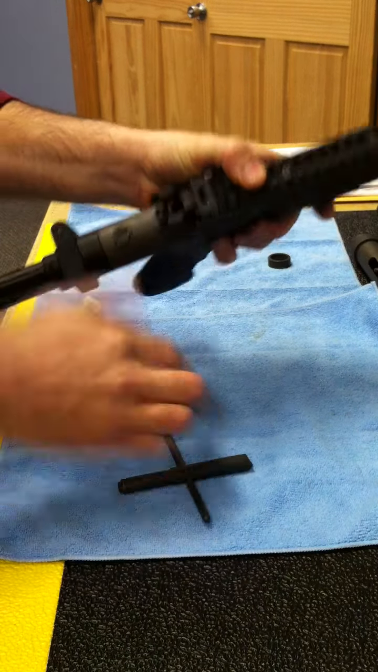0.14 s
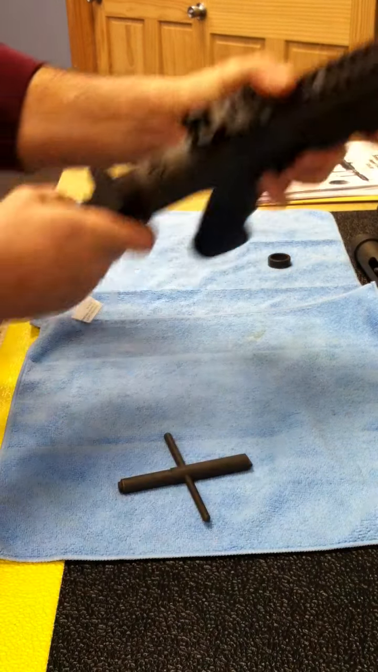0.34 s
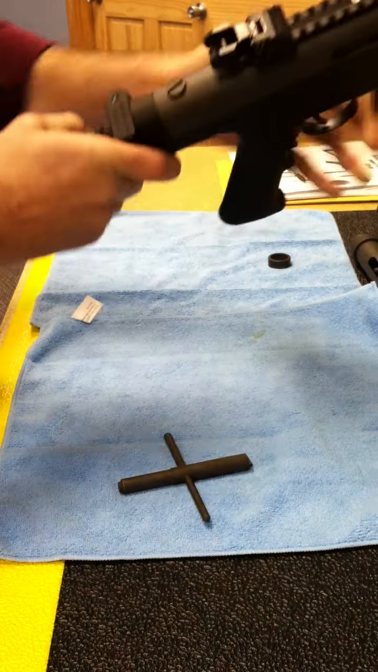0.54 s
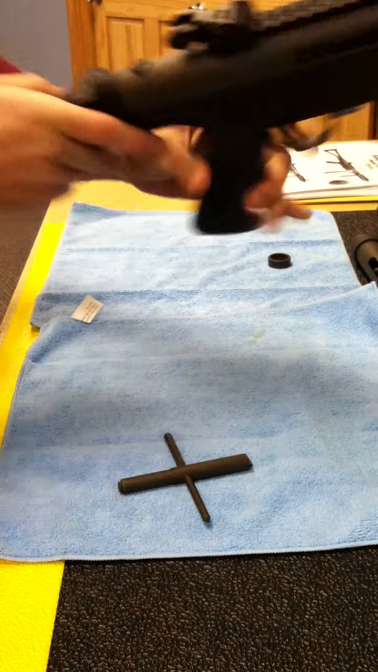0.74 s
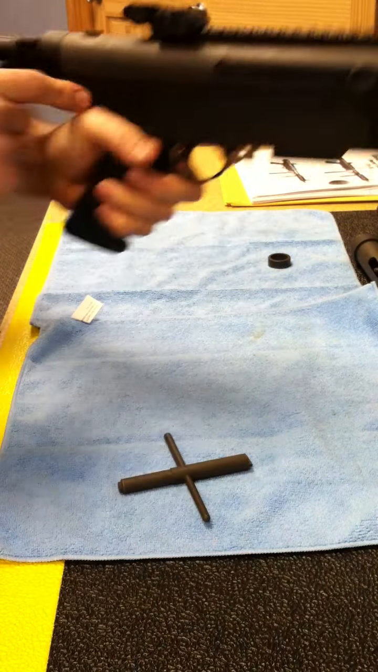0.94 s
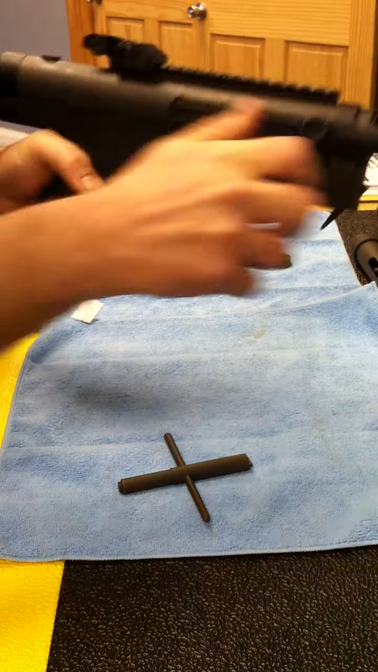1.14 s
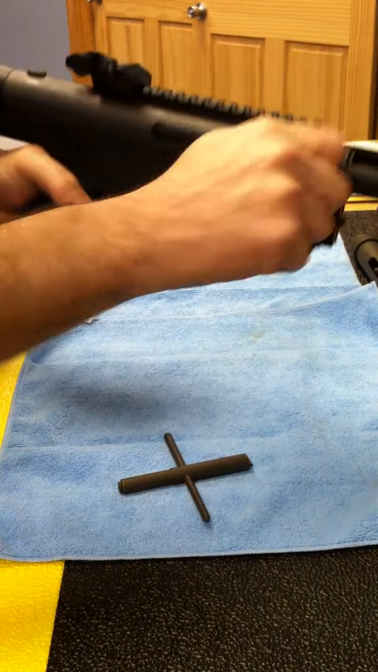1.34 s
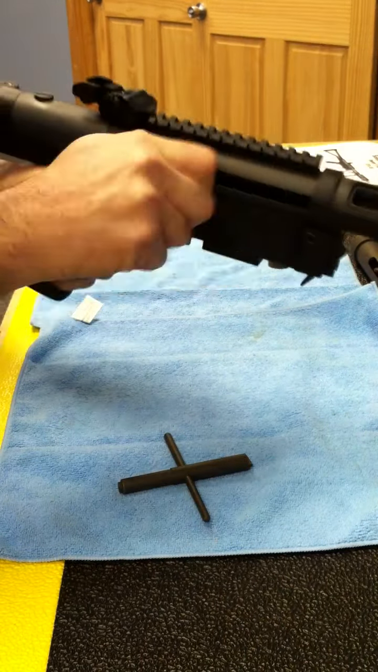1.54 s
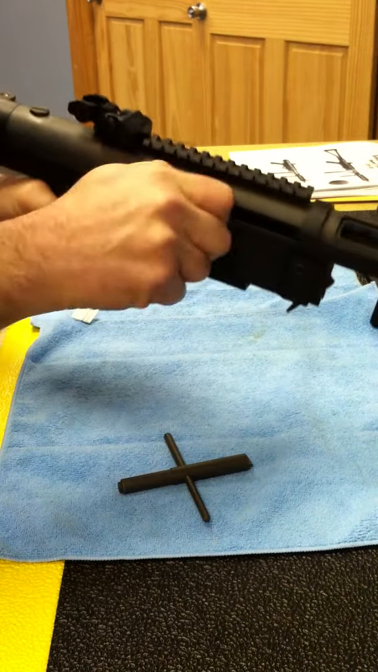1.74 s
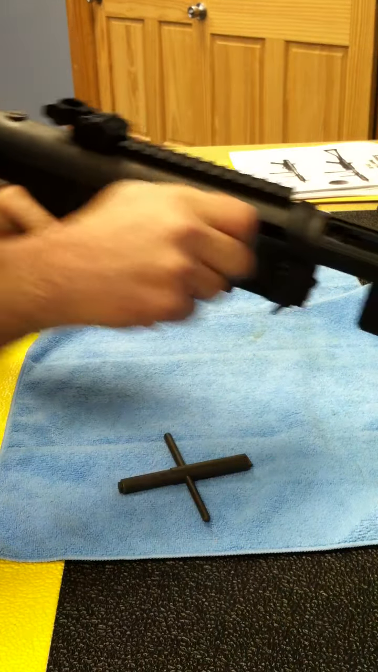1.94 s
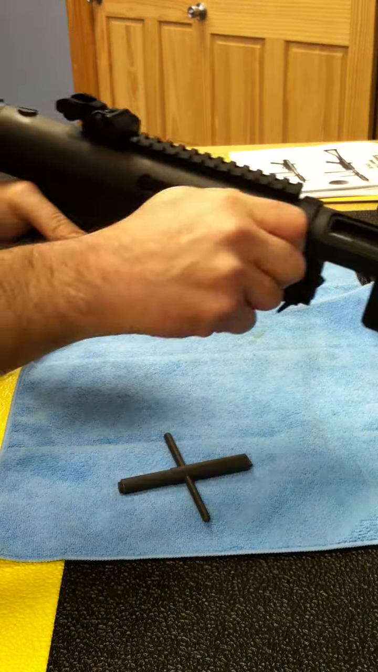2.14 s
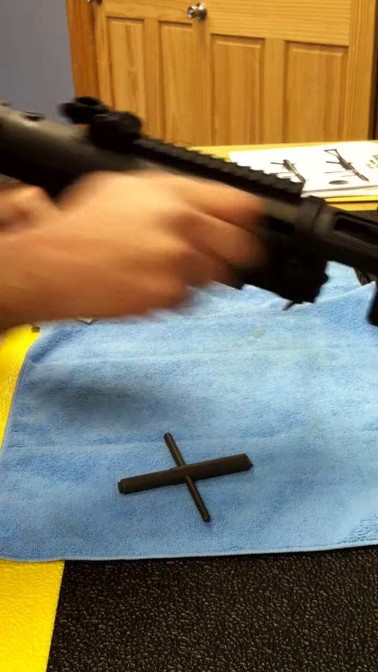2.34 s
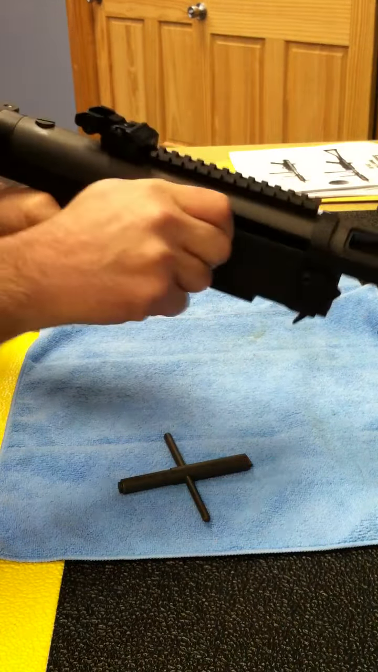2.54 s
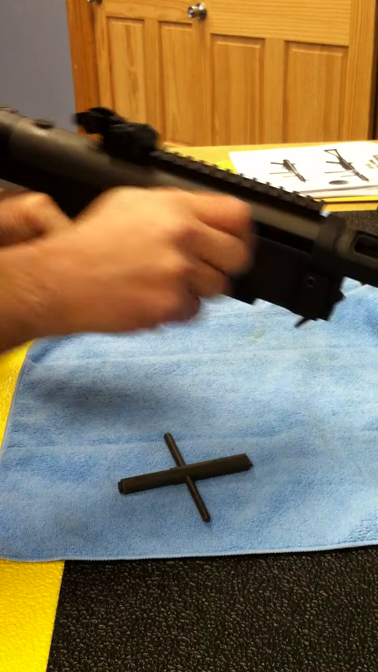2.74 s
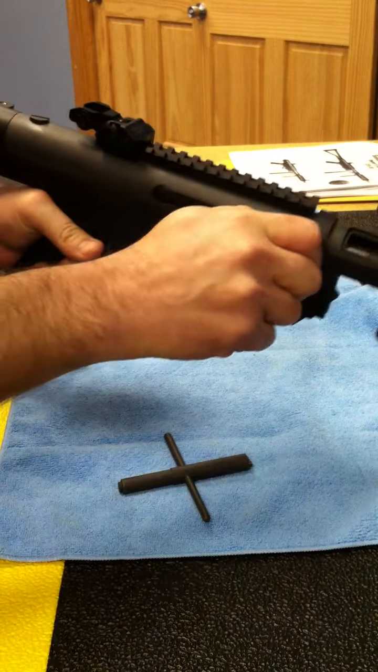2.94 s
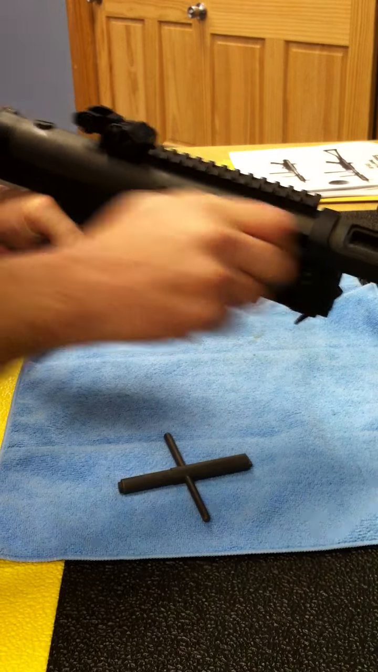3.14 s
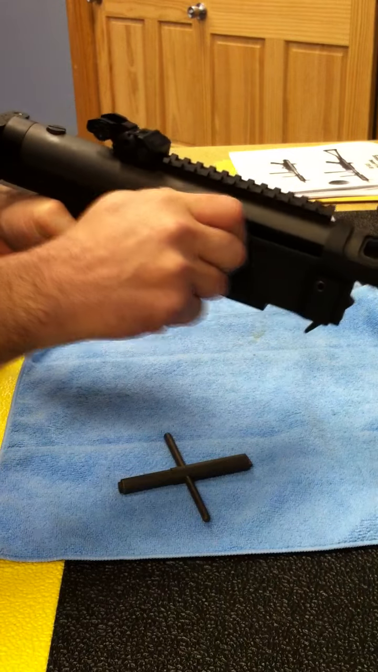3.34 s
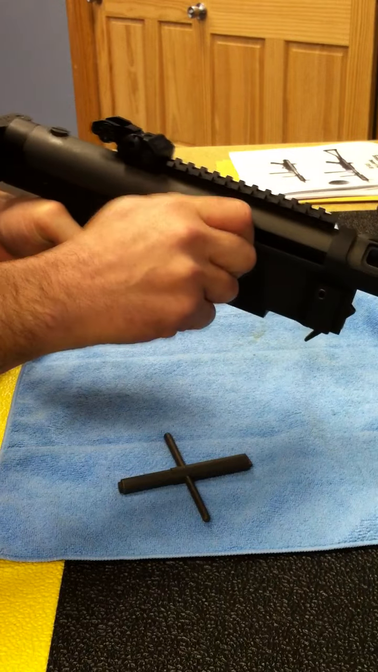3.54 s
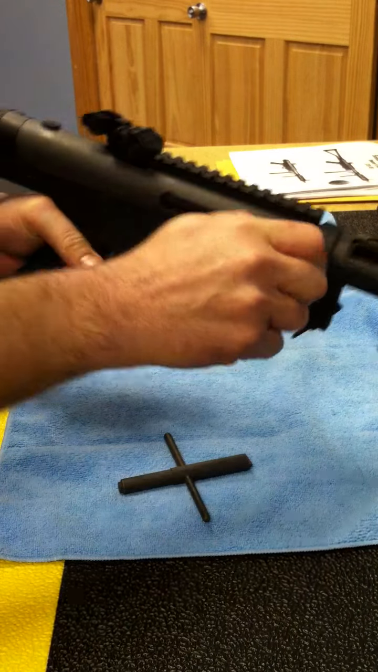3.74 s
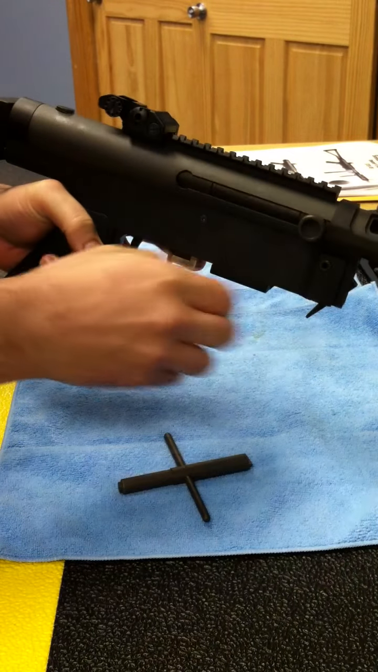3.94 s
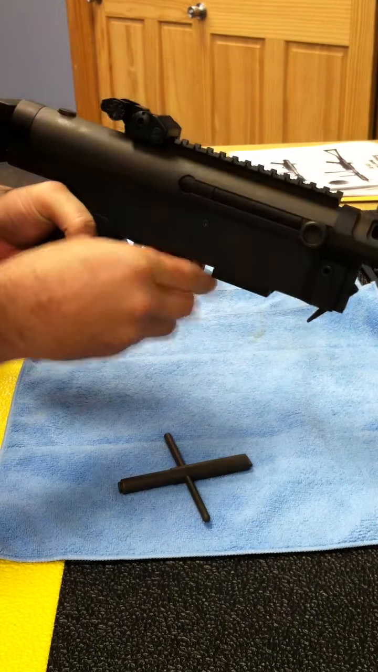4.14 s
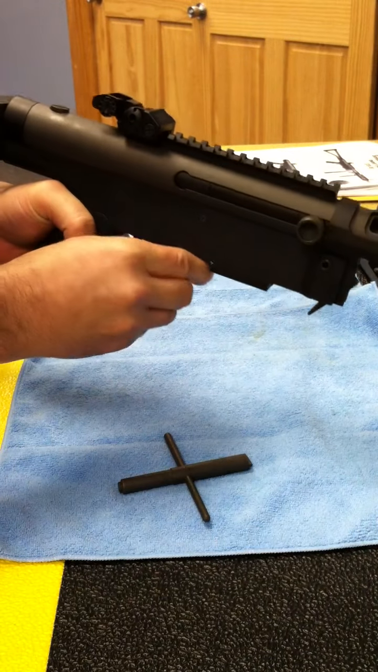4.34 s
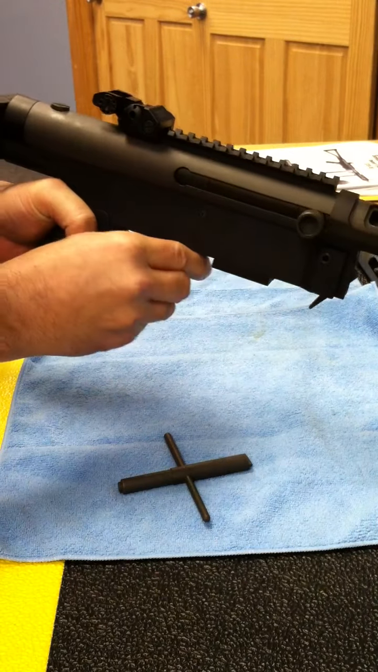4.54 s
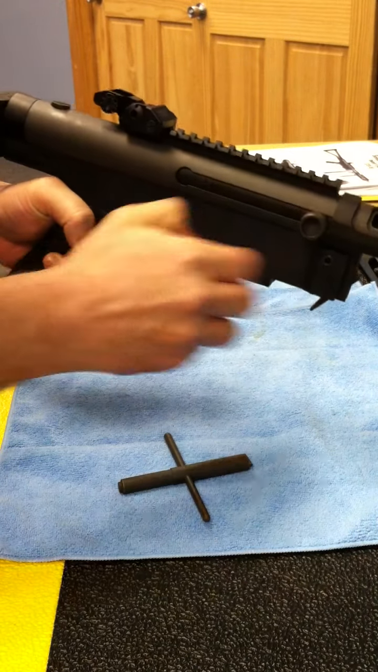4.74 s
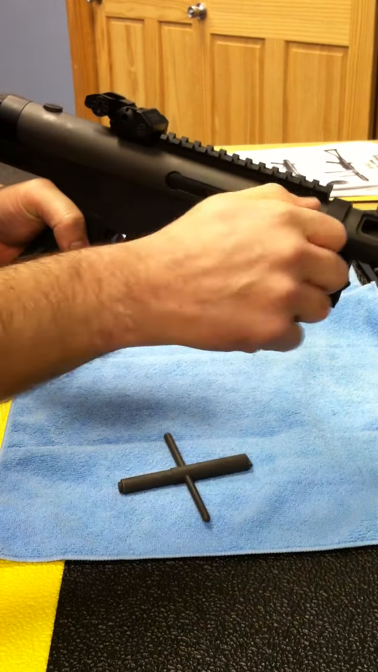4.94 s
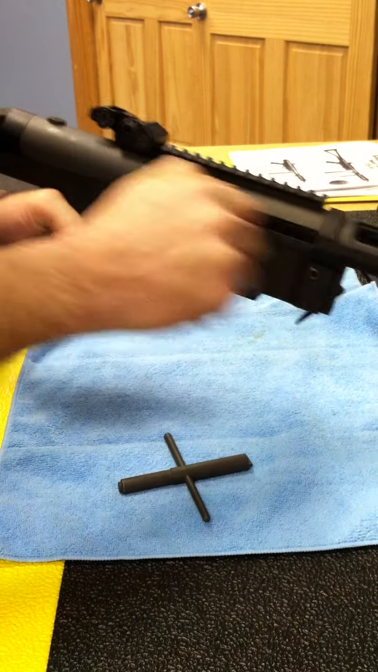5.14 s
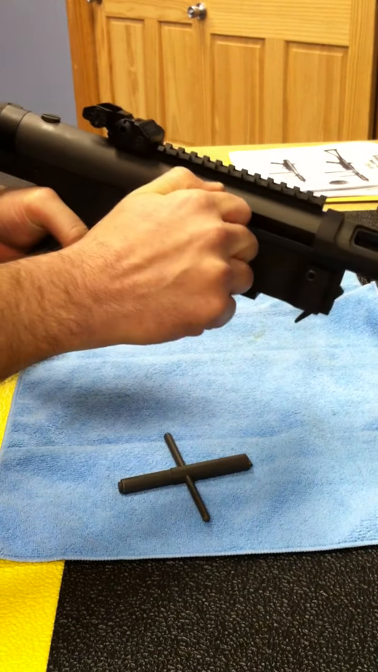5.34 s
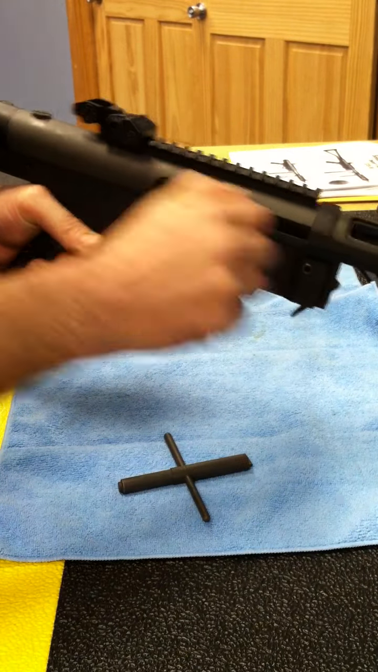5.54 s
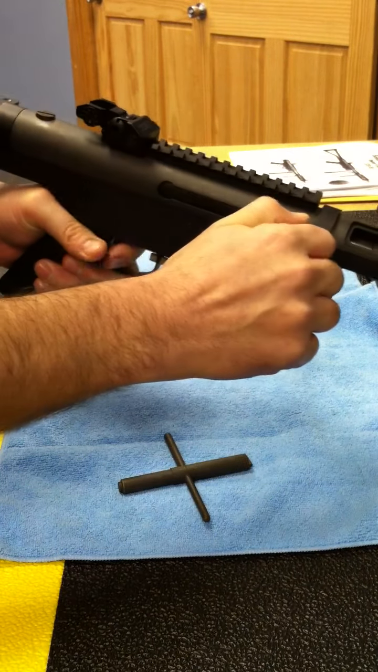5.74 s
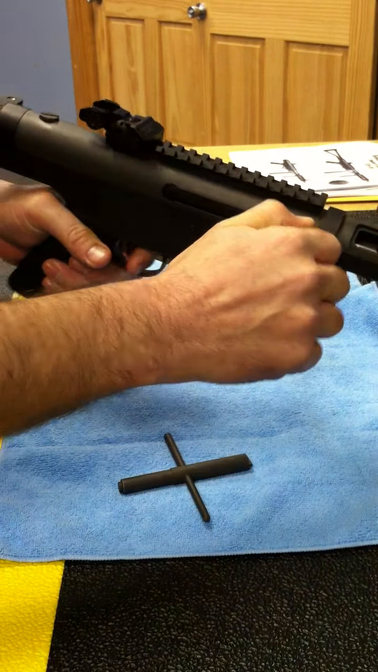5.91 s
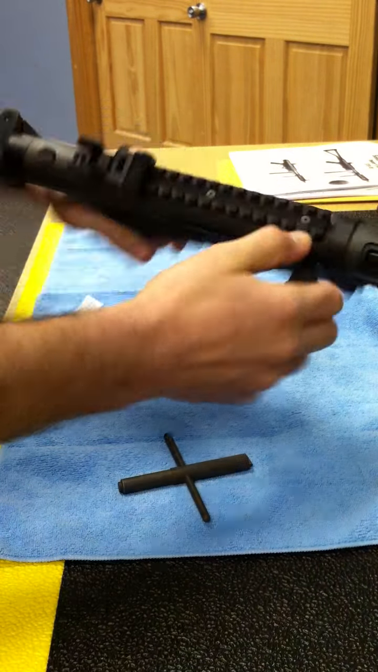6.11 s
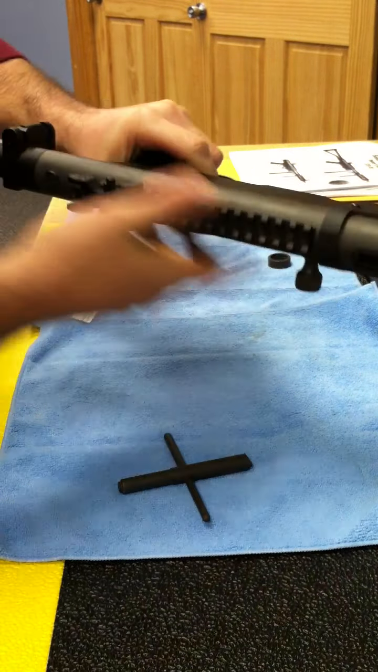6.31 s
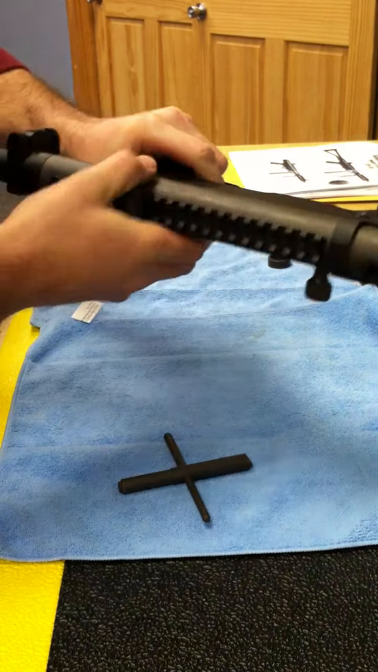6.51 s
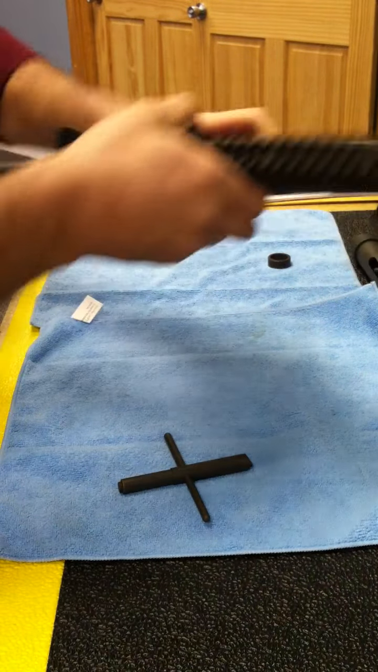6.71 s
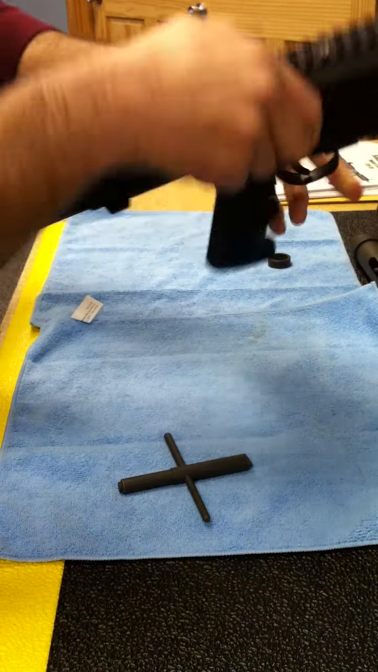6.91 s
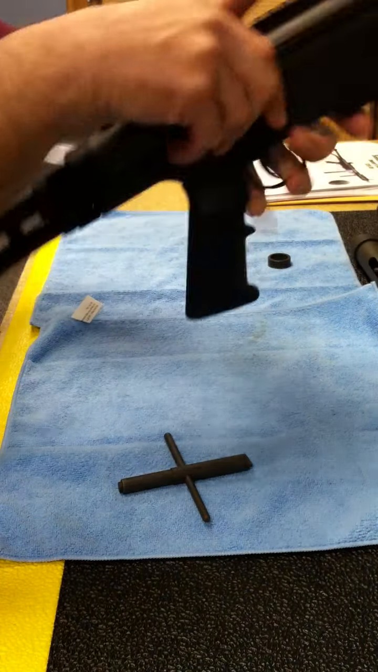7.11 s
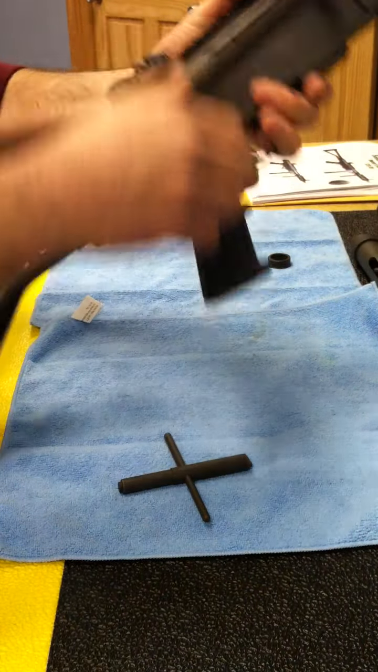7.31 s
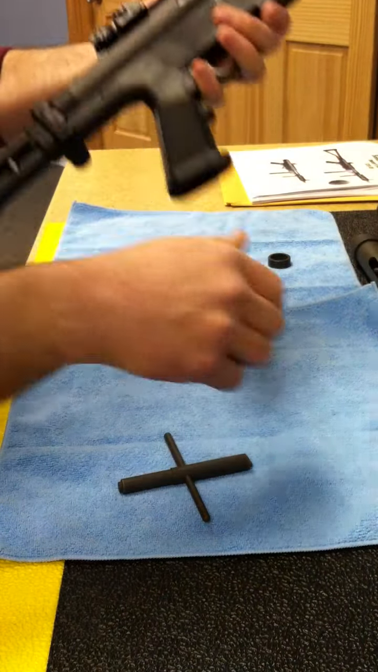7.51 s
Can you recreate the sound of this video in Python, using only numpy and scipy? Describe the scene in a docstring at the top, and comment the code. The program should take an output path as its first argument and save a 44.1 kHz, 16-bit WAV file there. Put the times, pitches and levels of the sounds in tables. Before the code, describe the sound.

A rifle's charging handle is racked four times in a small hard room, each a quick scrape, clack, slam and forward snap.

```python
"""Charging handle worked in a small room

A rifle's charging handle is worked four times over a towel-covered table between hard walls.
Filtered noise scrapes the bolt back; cracks and ringing steel make its stop, the carrier's knock and the slam;
the handle slides and snaps forward. After the last slam a softer clack follows, perhaps the handle's release.
Hands rub and small parts tick over quiet ventilation, which the recorder's gain control ducks after loud blows.
"""
import sys
import numpy as np
from scipy import signal
from scipy.fft import rfft, irfft
from scipy.io import wavfile
from scipy.ndimage import uniform_filter1d

SR = 44100
rng = np.random.default_rng(int(sys.argv[2]) if len(sys.argv) > 2 else 0)


def wav_record(signal):
    """Record a signal, one row per channel, as 16-bit PCM in the file named by sys.argv[1]."""
    frames = np.transpose(np.atleast_2d(signal))
    bounded = np.clip(frames, -1, 1)
    # unit amplitude maps onto the largest positive 16-bit level
    quanta = np.round(bounded * 32767).astype(np.int16)
    wavfile.write(sys.argv[1], SR, quanta)


N = 333788
T = np.arange(N) / SR

# colour of a small steel tick: (frequency [Hz], level [dB])
TICK_COLOUR = [(100, -26.5), (900, -14.5), (1500, -2.5), (2000, -2), (3100, 2), (4000, -1), (5200, 0.5),
               (6500, -4.5), (7300, -1.5), (8300, -5.5), (11000, -18), (16000, -32)]
TICK_MS = 7.1  # decay time of a tick's crack


def pull_back(count=3):
    """The bolt breaks free, scrapes and rattles back ever harder, bounces on its stop; the heavy carrier knocks."""
    # the bolt is drawn back: (start [s], final scrape level [dB])
    pulls = [(1.514, -42), (2.443, -33.5), (3.255, -37.5), (5.1811, -42)]
    # it reaches the rear stop: (time [s], level [dB], brightness [dB per octave], bounce re the stop [dB])
    rear_stops = [(1.6466, -5, 0, -11), (2.504, -7.5, 1.5, -2.5), (3.3189, -12.5, -0.5, 2),
                  (5.283, -5.5, 1, -13)]
    # the carrier bottoms out just after: (time [s], level [dB], brightness [dB per octave])
    carrier_knocks = [(1.6656, -7.5, 0), (2.5188, -4.5, 1), (3.335, -9, .5), (5.3047, -10.5, -1)]
    # colours of scrape, stop and knock: (frequency [Hz], level [dB])
    pull_colour = [(50, -30.5), (150, -17.5), (400, -5), (900, -2.5), (2800, 3), (5500, -6), (7700, 1.5),
                   (10000, -14.5), (15000, -32.5)]
    stop_colour = [(35, -64.5), (60, -36.5), (946, -12.5), (1310, 3), (1580, -1), (2050, 2), (2520, -5.5),
                   (3040, -5.5), (4640, -0.5), (5460, -8.5), (7400, 0), (8320, -8), (9790, -7.5),
                   (10800, -17.5), (16000, -35.5)]
    knock_colour = [(40, -29), (100, -29), (220, -21), (350, -10), (500, -12.5), (640, -8.5), (860, 0),
                    (1300, -2), (1750, -6.5), (3200, -3.5), (6400, -11), (8000, -16), (11800, -32),
                    (16000, -49.5)]
    swell_db = 9  # the scrape grows by this much on the way back
    break_db, rattle_db, scatter_db = 3, -1, -0.5  # breaking free and rattle re the scrape; rattle scatter
    bounce_s = .0034  # from the stop to its bounce
    stop_ms, knock_ms = 2.6, 3.8  # decay times of the cracks

    scrapes, rattles, stops = [], [], []
    for (start, scrape_db), (stop, db, tilt_db, bounce_db) in zip(pulls, rear_stops):
        start_db = scrape_db - swell_db
        scrapes.append((start, stop, start_db, scrape_db))
        rattles.append((start, start_db + break_db, 0, TICK_MS))
        for travel, chance in zip(rng.uniform(0.24, 1.0, count), rng.standard_normal(count)):
            level_db = start_db + travel * swell_db + rattle_db + scatter_db * chance
            rattles.append((start + travel * (stop - start), level_db, 0, TICK_MS))
        stops.append((stop, db, tilt_db, stop_ms))
        stops.append((stop + bounce_s, db + bounce_db, tilt_db, stop_ms))
    knocks = [(s, db, tilt_db, knock_ms) for s, db, tilt_db in carrier_knocks]
    return (blows(stops, stop_colour, body_db=-13.0, handle_db=-22, spread_db=1)
            + blows(knocks, knock_colour, body_db=-16, handle_db=-27, spread_db=-2)
            + blows(rattles, TICK_COLOUR, body_db=-7.5, handle_db=-18.5, spread_db=1.5)
            + slides(scrapes, pull_colour, from_hz=2700, to_hz=2910, width_hz=450, patchy_db=3.5, sing_db=-8))


def slam_home():
    """The bolt touches the breech, locks and rebounds; the softer clack is built of three contacts likewise."""
    # the bolt runs home; the last row is a softer clack before the handle slides:
    # (time [s], level [dB], brightness [dB per octave], first touch ahead by [s],
    # touch re the main contact [dB], rebound re the main contact [dB])
    slams = [(1.7589, -3, 0.57, 0.0042, -8.5, -14.5), (2.6663, -6.5, 0.54, 0.0051, -5, -6),
             (3.479, -10.5, 0.99, .0045, -9, -4.5), (5.3995, -3.5, .5, .0045, -10, -17),
             (5.6586, -12, 2, 0.0064, -5, -14)]
    # colour of slams and clack: (frequency [Hz], level [dB])
    slam_colour = [(40, -22.5), (90, -21.5), (250, -6), (350, -10), (500, -14), (650, -9), (1040, -5),
                   (1340, 0.5), (1660, -7.5), (1930, 0), (2700, -1), (4500, -5), (9500, -12), (16000, -47)]
    touch_tilt_db = 1  # per octave: the first touch is brighter than the main contact
    rebound_s = .006  # from the main contact to its rebound
    touch_ms, slam_ms = 3.6, 2.6  # decay times of the cracks

    contacts = []
    for s, db, tilt_db, ahead, touch_db, rebound_db in slams:
        contacts.append((s - ahead, db + touch_db, tilt_db + touch_tilt_db, touch_ms))
        contacts.append((s, db, tilt_db, slam_ms))
        contacts.append((s + rebound_s, db + rebound_db, 0, touch_ms))
    return blows(contacts, slam_colour, body_db=-11.5, handle_db=-27.5, spread_db=-2)


def handle_return():
    """The handle scrapes along its tube, squeals more the longer it slides, and snaps into its seat."""
    # the handle slides forward: (start [s], final scrape level [dB])
    returns = [(2.022, -41), (2.861, -41), (3.688, -43.5), (5.695, -34)]
    # it snaps into its front seat: (time [s], level [dB], brightness [dB per octave])
    seat_snaps = [(2.1252, -5.5, -0.5), (2.9596, -7, 0), (3.7761, -6.5, 0), (5.7325, -5, -1)]
    # the squeal's rough resonance: (start [Hz], end [Hz], width [Hz])
    squeal = (2350, 2880, 480)
    # colours of scrape and snap: (frequency [Hz], level [dB])
    return_colour = [(50, -38.5), (250, -19), (700, -9.5), (1350, -3), (2000, -3.5), (4000, -8), (5100, -1),
                     (6000, -5), (6850, 2), (7400, 3.5), (8500, -4.5), (11000, -14), (15000, -26)]
    snap_colour = [(40, -33.5), (150, -29), (400, -22), (850, -8.5), (1200, -9), (2100, -5), (3600, -4),
                   (4500, 0), (5200, -4.5), (6000, -1), (8000, -1.5), (10000, -6), (11500, -16),
                   (16000, -35)]
    squeal_db, build_s = 2.5, .095  # full level re the scrape; slide time needed to reach it
    fade_db = 3.5  # the scrape fades as the handle runs forward
    snap_ms = 2.9  # decay time of the crack

    scrapes = np.zeros(N)
    for (start, scrape_db), (snap, _, _) in zip(returns, seat_snaps):
        sing_db = squeal_db + 20 * np.log10(min((snap - start) / build_s, 1))
        slide = [(start, snap, scrape_db + fade_db, scrape_db)]
        scrapes += slides(slide, return_colour, *squeal, patchy_db=3.5, sing_db=sing_db)
    snaps = [(s, db, tilt_db, snap_ms) for s, db, tilt_db in seat_snaps]
    return scrapes + blows(snaps, snap_colour, body_db=-16, handle_db=-19, spread_db=0)


def blows(table, points, body_db, handle_db, spread_db):
    """Steel on steel: a crack, the receiver's short ring, the handle's faint long one.

    Takes (time [s], level [dB], brightness [dB per octave], decay [ms]); 0 dB is the energy of rms 1 over 5 ms.
    Returns the sound towards the microphone and the sound sent into the room."""
    # short resonances of the receiver: (frequency [Hz], level [dB], t60 [s])
    receiver = [(357, -5.5, 0.044), (640, -1, 0.046), (905, -1, 0.028), (1290, -5, 0.04), (1490, -8, 0.021),
                (1950, -6, 0.027), (3010, -6.5, 0.066), (4620, -12, 0.04), (7050, -5.5, 0.095)]
    # the thin steel handle rings on: (frequency [Hz], level [dB], t60 [s])
    handle_modes = [(1315, -9.5, .25), (2763, -4, 0.14), (4820, -6, .23), (6030, -5, 0.3),
                    (7050, -5.5, 0.38), (7200, -2.5, 0.29), (7461, -5, .35), (10000, -9, .28)]
    out = np.zeros((2, N))
    t = T[:SR * 2 // 5]
    for s, db, tilt_db, decay_ms in table:
        gain = undb(db) * np.sqrt(SR / 200)
        body = undb(body_db) * ring(receiver, t)
        handle = undb(handle_db) * ring(handle_modes, t)
        direct = unit(colour(crack(t, decay_ms) + body, points, tilt_db)) + handle
        add(out[0], s, gain * direct)
        # summed over all directions the crack's peaks and dips even out into a plain pulse
        pulse = signal.unit_impulse(len(t)) + body / 2
        add(out[1], s, gain * undb(spread_db) * unit(colour(pulse, points, tilt_db)))
    return out


def crack(t, decay_ms):
    """Countless steel modes that die within milliseconds in the gripping hands."""
    fade = np.exp(-1000 * t / max(decay_ms, .3))
    spectrum = rfft(rng.standard_normal(len(t)) * fade)
    # a hard contact feeds all frequencies about evenly
    evened = spectrum / (abs(spectrum) + 1e-9) ** .7
    return unit(irfft(evened, len(t)) * fade ** .1)


def ring(modes, t):
    """Decaying modes; each blow excites them with slightly different levels, pitches and phases."""
    total = np.zeros(len(t))
    chance = rng.standard_normal((len(modes), 3))
    for (hz, db, t60), (level, detune, phase) in zip(modes, chance):
        tone = np.sin(2 * np.pi * hz * (1 + 0.0025 * detune) * t + phase)
        total += undb(db + 2 * level) * unit(tone * np.exp(-np.log(1000) * t / t60))
    return unit(total)


def slides(table, points, from_hz, to_hz, width_hz, patchy_db, sing_db):
    """Steel scrapes along its tube in uneven slips; a rough resonance rises as the part travels.

    Takes (start [s], end [s], start level [dB], end level [dB])."""
    out = np.zeros(N)
    for start, end, start_db, end_db in table:
        n = max(int((end - start) * SR), SR // 100)
        travel = np.linspace(0, 1, n)
        hz = from_hz + (to_hz - from_hz) * np.sin(np.pi / 2 * travel)
        # slow complex noise, shifted up to the moving pitch, is a narrow band of noise there
        noise = rng.standard_normal(n) + 1j * rng.standard_normal(n)
        wander = signal.lfilter(*signal.butter(2, width_hz / 2, fs=SR), noise)
        carrier = np.exp(2j * np.pi * np.cumsum(hz) / SR)
        sing = unit(np.real(wander * carrier)) * np.sqrt(n)
        scrape = friction(n, points, grain_db=2.5) + undb(sing_db) * sing
        pressure_db = start_db + (end_db - start_db) * travel + patchy_db * walk(n, rate=150)
        add(out, start, scrape * undb(pressure_db) * signal.windows.tukey(n, .12))
    return out


def friction(n, points, grain_db):
    """Dense microscopic slips of uneven size, as noise in 32-sample grains; rms 1."""
    grains_db = grain_db * np.minimum(rng.exponential(size=n // 32 + 1), 5)
    size = np.repeat(undb(grains_db), 32)[:n]
    return unit(colour(rng.standard_normal(n) * size, points)) * np.sqrt(n)


def loose_parts():
    """Small parts tick against the gun and ring briefly at their own note."""
    # loose parts and catches: (time [s], level [dB], brightness [dB per octave], note [Hz], note re the tick [dB])
    part_ticks = [(1.340, -44.5, -1.5, 2480, -9.5), (2.021, -36, 0.5, 1510, 4.5),
                  (2.376, -39, -4, 3950, -6.5), (4.479, -61, 4, 6020, -11), (4.559, -48.5, -1.5, 3100, -18),
                  (4.755, -60, 0, 6000, -6.5), (5.017, -40, 3, 7200, -2.5), (5.048, -49, -1.5, 2560, -7),
                  (5.0845, -48.5, 1.5, 5160, 1), (5.948, -29, 3.5, 4430, -8), (6.382, -50.5, -1, 2680, -6),
                  (6.958, -66.5, -2, 1590, 6.5), (7.255, -65, -1, 2500, -10), (7.542, -63, 3, 1710, -5)]
    note_t60_s = 0.02
    note_spread_db = -5  # a small part sends less of its note into the room

    notes = np.zeros(N)
    for s, db, _, hz, note_db in part_ticks:
        add(notes, s, undb(db + note_db) * swing(hz, note_t60_s))
    ticks = [(s, db, tilt_db, TICK_MS) for s, db, tilt_db, _, _ in part_ticks]
    rings = np.array([notes, undb(note_spread_db) * notes])
    return rings + blows(ticks, TICK_COLOUR, body_db=-10, handle_db=-18.5, spread_db=4)


def swing(hz, t60):
    """One damped resonance, softly started, with the energy of rms 1 over 5 ms."""
    t = T[:SR // 2]
    onset = 1 - np.exp(-(2 * hz * t) ** 2)
    decay = np.exp(-np.log(1000) * t / t60)
    return np.sqrt(SR / 200) * unit(np.sin(2 * np.pi * hz * t) * decay * onset)


def table_bumps():
    """Blows ring the table; a longer contact leaves out its higher resonances."""
    # the hand leaves the table with a light tap and a soft thump: (time [s], level [dB], contact [ms])
    table_blows = [(.070, -41, .3), (.156, -36.5, 2.06)]
    # resonances of the table: (frequency [Hz], level [dB], t60 [s])
    table_modes = [(131.4, -6.5, 0.33), (205, 0, 0.12), (282, 0, 0.071), (485, -4, 0.066), (930, 2, 0.0074)]
    out = np.zeros(N)
    hz, mode_db, t60 = np.transpose(table_modes)
    for s, db, contact_ms in table_blows:
        shares = unit(undb(mode_db) / (1 + (hz * contact_ms / 1000) ** 4))
        add(out, s, undb(db) * sum(share * swing(f, t) for share, f, t in zip(shares, hz, t60)))
    return out


def hands():
    """Skin and cloth brush the gun as grainy noise; each change of grip swells and fades."""
    # skin and sleeves rub as the grip changes: (middle [s], length [s], level [dB])
    strokes = [(0.949, 0.5, -73.5), (4.815, 0.12, -67), (6.347, .18, -70), (6.85, 0.22, -75.5),
               (7.298, .2, -87)]
    # colour of the rub: (frequency [Hz], level [dB])
    rub_colour = [(300, -5.5), (1500, -1), (4000, -2), (8000, -4.5), (11000, -16), (16000, -22)]
    grip_db = -77  # the steady rub of the holding hand
    pressure = undb(grip_db) * np.ones(N)
    for middle, length, db in strokes:
        add(pressure, middle - length / 2, undb(db) * np.hanning(int(length * SR)))
    return friction(N, rub_colour, grain_db=2) * pressure


def air():
    """A low rush of ventilation and microphone hiss, as filtered noise, with one wavering fan tone."""
    # colour of the rush: (frequency [Hz], level [dB])
    air_colour = [(15, -58), (25, -21.5), (33, -33), (117, -7), (223, 2), (439, -6.5), (476, -6),
                  (624, -9.5), (1100, -12), (1290, -17.5), (1560, -14.5), (1890, -17), (2050, -15.5),
                  (6920, -29), (16000, -40)]
    air_db = -66
    fan_hz, fan_db = 478, -7.5  # mean pitch; peak level re the rush's rms
    fan = np.sin(2 * np.pi * np.cumsum(fan_hz + 3.9 * walk(N, rate=5.9)) / SR)
    return (friction(N, air_colour, grain_db=-1.0) + undb(fan_db) * fan) * undb(air_db)


def room(near, spread, count=7):
    """Echoes from table and near walls, and the tail, whose fine pattern changes as the gun moves."""
    # near surfaces: (delay [ms], level [dB])
    echoes = [(2.9, -17.5), (8.7, -14), (10.2, -14), (21.3, -26), (23, -30.5)]
    out = near.copy()
    # the tails take turns, crossfading ten times a second
    for k in range(count):
        distance = (T * 10 - k + 1) % count - 1
        share = np.cos(np.pi / 2 * np.minimum(distance, 1))
        out += signal.fftconvolve(spread * share, tail())[:N]
    for ms, db in echoes:
        add(out, ms / 1000, undb(db) * near)
    return out


def tail(build_s=.022):
    """A diffuse room response: noise that builds up, then fades at a rate set for each frequency."""
    # the tail's colour: (frequency [Hz], level [dB])
    room_colour = [(100, -14.5), (400, -8.5), (700, -5.5), (1300, -7), (2200, -11.5), (4500, -12.5),
                   (7500, -14.5), (10000, -17), (15000, -12.5)]
    # its decay: (frequency [Hz], t60 [s])
    room_t60 = [(100, 0.35), (500, 0.6), (1200, 0.86), (2500, 0.71), (4500, 0.66), (8000, 0.47),
                (14000, 0.33)]
    hz, frame_s, cells = signal.stft(rng.standard_normal(SR), SR, nperseg=256)
    t60 = at(room_t60, hz)[:, None]
    decay = np.exp(-np.log(1000) * frame_s / t60)
    fading = signal.istft(cells * decay / np.sqrt(t60), SR)[1][:SR]
    build_up = 1 - np.exp(-(T[:SR] / build_s) ** 2)
    return colour(unit(fading * build_up), room_colour)


def walk(n, rate):
    """A random line with rate turning points a second."""
    knots = rng.standard_normal(N // 100)
    return np.interp(T[:n] * rate, np.arange(len(knots)), knots)


def colour(x, points, tilt_db=0, size=4096):
    """Minimum-phase filter through (Hz, dB) points, tilted about 3 kHz in dB per octave (level below 500 Hz)."""
    hz = np.fft.rfftfreq(size, 1 / SR)
    db = at(points, hz) + tilt_db * np.log2(np.maximum(hz, 500) / 3000)
    # folding the cepstrum forward makes the filter causal
    cepstrum = irfft(np.log(undb(db)))
    cepstrum[1:size // 2] *= 2
    cepstrum[size // 2 + 1:] = 0
    response = irfft(np.exp(rfft(cepstrum)))
    return signal.fftconvolve(x, response)[:len(x)]


def at(points, hz):
    """Read a spectrum on a log-frequency axis."""
    f, v = np.transpose(points)
    return np.interp(np.log(hz + 1), np.log(f), v)


def undb(db):
    """Decibels to gain."""
    return 10 ** (np.asarray(db) / 20)


def unit(x):
    """Scale to energy 1."""
    return x / np.sqrt(np.sum(x ** 2))


def add(out, s, x):
    """Mix x in at time s."""
    i = max(int(s * SR), 0)
    out[i:i + len(x)] += x[:N - i]


def scene():
    """The action, the hands and the table in the room, over the ventilation."""
    action = pull_back() + slam_home() + handle_return() + loose_parts()
    near, spread = action + table_bumps() + hands()
    return (room(near, spread) + air())[None]


def gain_control(x, size=220):
    """Turns down at once for a loud sound and creeps back up at a steady rate."""
    threshold_db, duck_db, recover_db_per_s = -27.5, 10, 6  # start, deepest reduction, recovery
    level_db = 10 * np.log10(np.maximum(uniform_filter1d(x ** 2, size), 1e-12))
    wanted_db = np.clip(level_db - threshold_db, 0, duck_db)
    recovery_db = recover_db_per_s * T
    # the deepest reduction so far holds, less what has recovered since
    held_db = np.maximum.accumulate(wanted_db + recovery_db, axis=-1) - recovery_db
    return x * undb(-uniform_filter1d(held_db, size // 2))


def record(dry):
    """The recorder rides its gain, rounds the highest peaks and cuts the top."""
    ceiling, top_hz = .9, 15800
    rounded = ceiling * np.tanh(gain_control(dry) / ceiling)
    return signal.sosfilt(signal.ellip(8, .2, 70, top_hz, fs=SR, output="sos"), rounded)


dry = scene()
out = record(dry)
wav_record(out)
```